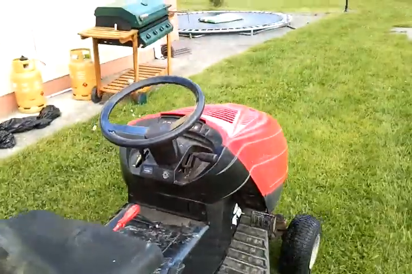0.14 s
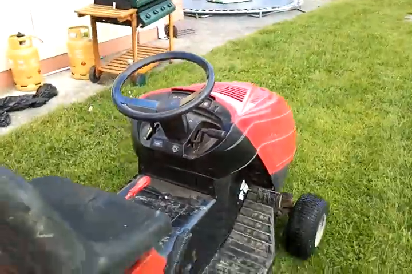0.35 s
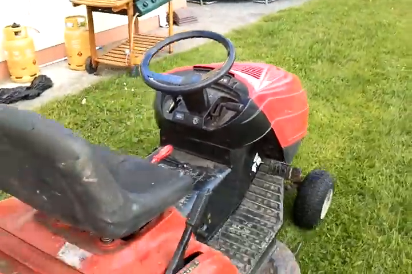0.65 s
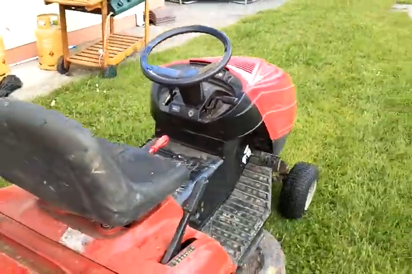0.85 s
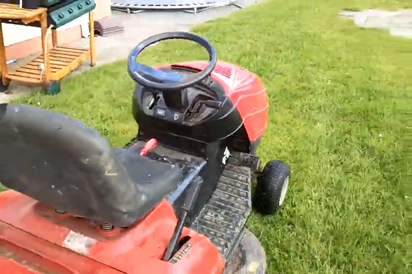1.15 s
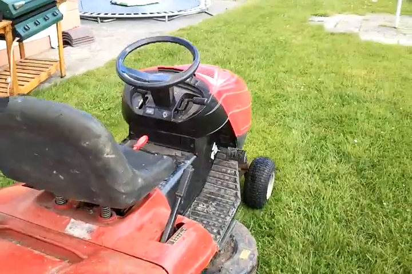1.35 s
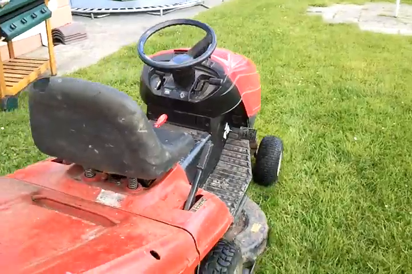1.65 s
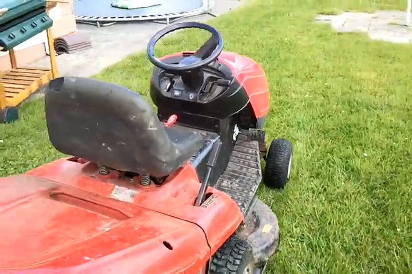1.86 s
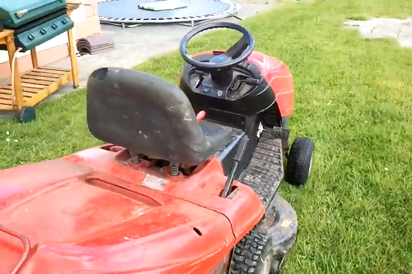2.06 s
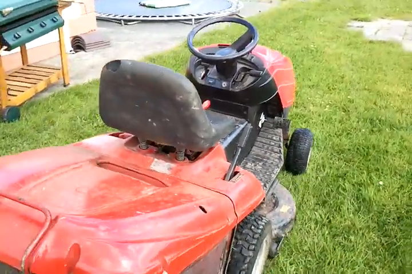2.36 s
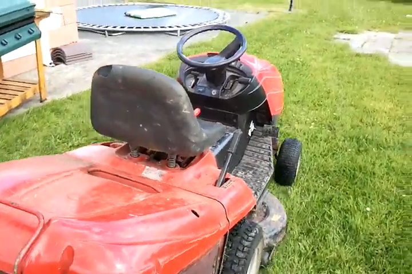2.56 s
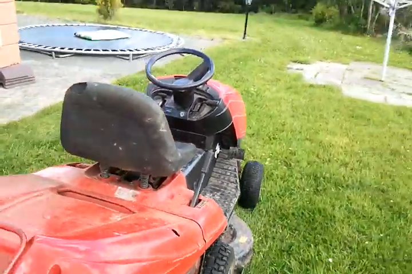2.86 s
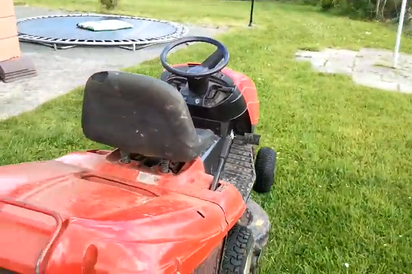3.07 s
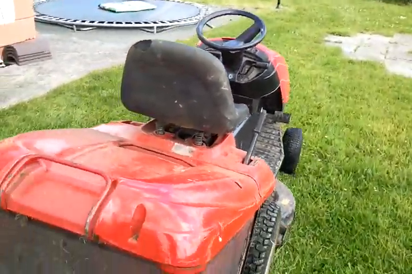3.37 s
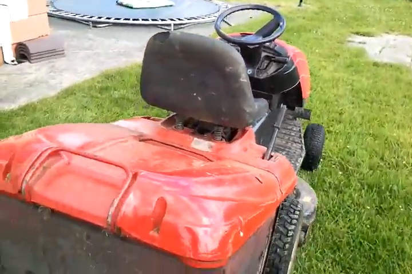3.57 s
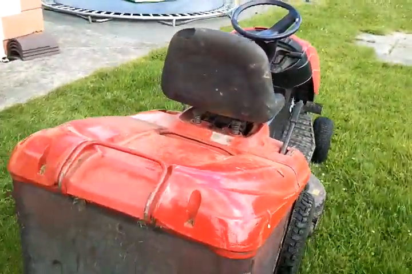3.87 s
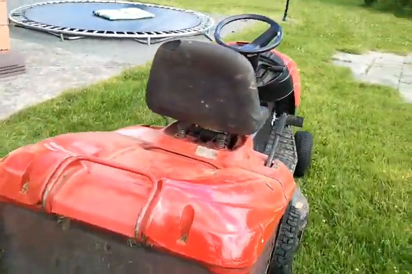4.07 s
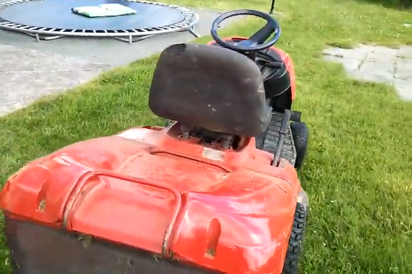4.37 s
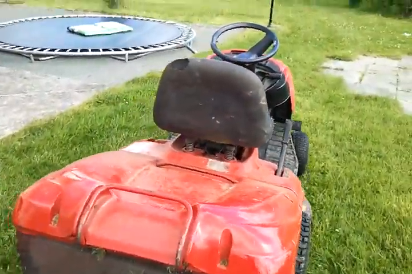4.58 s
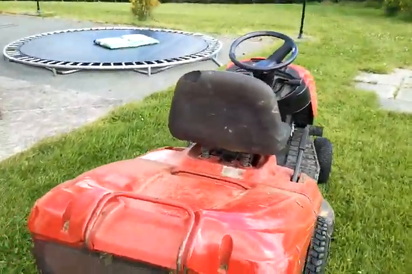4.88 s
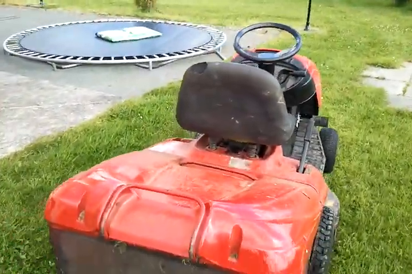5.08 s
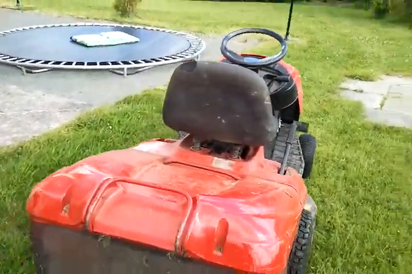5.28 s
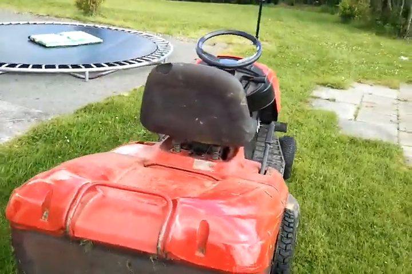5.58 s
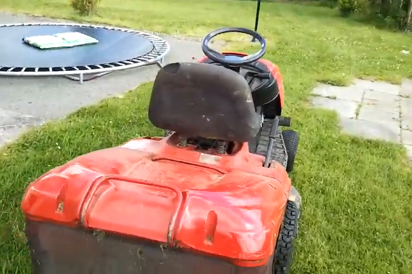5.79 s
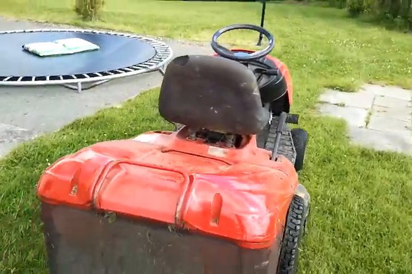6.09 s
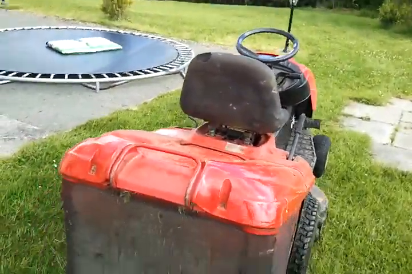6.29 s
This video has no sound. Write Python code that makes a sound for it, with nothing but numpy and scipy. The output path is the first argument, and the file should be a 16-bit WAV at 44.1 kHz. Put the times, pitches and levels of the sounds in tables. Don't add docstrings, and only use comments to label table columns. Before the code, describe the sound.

A tiny scrap of bright noise, then about half a second of silence. A ride-on mower engine fades in quickly and idles fast and steadily, with a throaty buzzing exhaust, fluttering fan whine and thin metallic clatter. Outdoors on a lawn, close to a small overloaded microphone that moves from beside the machine to behind it; wind thumps the microphone now and then.

```python
import sys
import numpy as np
from scipy import signal
from scipy.fft import rfft, irfft
from scipy.io import wavfile

SR = 44100
rng = np.random.default_rng(int(sys.argv[2]) if len(sys.argv) > 2 else 0)


def field_ratio(decibels):
    return 10 ** (np.asarray(decibels, dtype=float) / 20)


def wav_out(sig):
    wavfile.write(sys.argv[1], SR, np.round(np.clip(np.atleast_2d(sig).T, -1, 1) * 32767).astype(np.int16))


N = 284004
T = np.arange(N) / SR


def rms_one(x):
    return x / np.sqrt(np.mean(x ** 2) + 1e-20)


def in_time(rows):
    s, *columns = np.transpose(rows)
    return [np.interp(T, s, column) for column in columns]


def drift(rate):
    r = np.exp(-40 * np.pi * rate / SR)
    white = rng.standard_normal(N // 20 + 4002)
    slow = signal.lfilter([1], [1, -2 * r, r * r], white)[4000:]
    return np.interp(np.arange(N) / 20, np.arange(len(slow)), rms_one(slow - slow.mean()))


def resonance(x, hz, width_hz):
    r = np.exp(-np.pi * width_hz / SR)
    zeros = np.array([1, 0, -1]) * (1 - r * r) / 2
    poles = [1, -2 * r * np.cos(2 * np.pi * hz / SR), r * r]
    return signal.lfilter(zeros, poles, x)


def band(x, low_hz, high_hz):
    return signal.sosfilt(signal.butter(2, [low_hz, high_hz], "band", fs=SR, output="sos"), x)


def coloured(x, spectrum):
    hz, db = np.transpose(spectrum)
    bins = np.fft.rfftfreq(N, 1 / SR) + 1
    gain = field_ratio(np.interp(np.log(bins), np.log(hz), db, left=-60))
    return rms_one(irfft(rfft(x) * gain, N))


# time in seconds, level in dB.
SCRAP_LEVEL = [(0, -39), (.012, -46), (.02, -56), (.0255, -79), (.027, -140)]
# frequency in Hz, density in dB per Hz.
SCRAP_SPECTRUM = [(100, 5), (400, -4), (1000, -3), (5000, -5), (7500, -6), (9000, -27)]


def earlier_scene():
    noise = coloured(rng.standard_normal(N), SCRAP_SPECTRUM)
    return field_ratio(in_time(SCRAP_LEVEL)[0]) * noise * (T < .027)


# time in seconds, firings per second.
FIRING_RATE = [(0.6, 23.243), (1.087, 23.228), (1.573, 23.206), (2.06, 23.285), (2.547, 23.255),
               (3.033, 23.203), (3.52, 23.198), (4.007, 23.388), (4.493, 23.225), (4.98, 23.266),
               (5.467, 23.215), (5.953, 23.195), (6.44, 23.261)]


def engine_cycles():
    return np.cumsum(in_time(FIRING_RATE)[0]) / SR


# time in seconds, distance to the engine in metres.
DISTANCE = [
    (0.85, 1.29),
    (1.7, 1.67),
    (2.5, 1.97),
    (3.3, 2.08),
    (4.2, 2.44),
    (5.0, 2.65),
    (5.5, 2.34),
    (6.44, 3.04),
]


def spreading_loss():
    return 20 * np.log10(in_time(DISTANCE)[0])


STATION_TIMES = [
    2.5,
    3.75,
    4.8,
]
# multiple of the firing rate, level in dB.
EXHAUST_BESIDE = [(1, -20.0), (2, -10.0), (3, -11.0), (4, -5.0), (5, 0.0), (6, 1.0), (7, -7.0), (8, -12.0),
                  (9, -4.0), (10, -6.0), (11, -16.0), (12, -11.0), (13, -21.0), (14, -6.0), (15, -10.0),
                  (16, -22.0), (17, -14.0), (18, -33.0), (19, -26.0), (20, -16.0), (21, -12.0), (22, -15.0)]
EXHAUST_CORNER = [(1, -17.0), (2, -16.0), (3, -6.0), (4, 1.0), (5, -5.0), (6, 2.0), (7, -1.0), (8, -5.0),
                  (9, -5.0), (10, -32.0), (11, -7.0), (12, -21.0), (13, -24.0), (14, -13.0), (15, -18.0),
                  (16, -8.0), (17, -27.0), (18, -21.0), (19, -18.0), (20, -4.0), (21, -9.0), (22, -18.0)]
EXHAUST_BEHIND = [(1, -15.0), (2, -13.0), (3, -20.0), (4, -3.0), (5, 0.0), (6, -5.0), (7, -6.0), (8, -2.0),
                  (9, -7.0), (10, -12.0), (11, -11.0), (12, -24.0), (13, -10.0), (14, -16.0), (15, -8.0),
                  (16, -11.0), (17, -28.0), (18, -23.0), (19, -13.0), (20, 0.0), (21, -12.0), (22, -14.0)]
EXHAUST_ECHOES = [
    (.799, .29, -.9, .44, .2),
    (.788, .334, -.9, .66, -.05),
    (.794, .299, -.79, .762, -.575),
]


def exhaust(cycles, level_db, uneven_db, scatter, muffled_db):
    out = 0
    chance = rng.uniform(-1.27, 1, len(EXHAUST_BESIDE))
    cycles = cycles + 0.0015 * drift(9)
    wavering = [field_ratio(uneven_db * drift(4.9)) for k in range(5)]
    fires_at, pipe_after, pipe, wall_after, wall = np.transpose(EXHAUST_ECHOES)
    for k, *stations in zip(np.arange(1, 99), EXHAUST_BESIDE, EXHAUST_CORNER, EXHAUST_BEHIND):
        upper = k > 9
        turn = -2j * np.pi * k
        echoes = 1 + pipe * np.exp(turn * pipe_after) + wall * np.exp(turn * wall_after)
        smear = scatter * np.pi * chance[k - 1] * upper
        size = field_ratio(np.array(stations)[:, 1] + muffled_db * upper * (2.5 - k % 2))
        lead = np.unwrap(np.angle(echoes * np.exp(turn * fires_at))) + smear
        wave = np.cos(2 * np.pi * k * cycles + np.interp(T, STATION_TIMES, lead))
        swell = wavering[k % 5] ** (1 + 2.4 * upper)
        out = out - swell * np.interp(T, STATION_TIMES, size) * wave
    return field_ratio(level_db) * rms_one(out)


# time in seconds, opening toward the listener in dB.
FAN_OPENING = [
    (0.85, -17),
    (1.3, -2.5),
    (2.4, 3.5),
    (2.9, -10),
    (3.7, -14),
    (4.1, -3.5),
    (5.3, -1.5),
    (5.7, -15),
    (6.44, -9),
]


def fan(cycles):
    open_db, = in_time(FAN_OPENING)
    cycles = cycles + 0.0042 * drift(3.5)
    blade_db = -19 + open_db + 1.5 * drift(6.2)
    octave_db = -17.5 - 2.5 * T + 0.23 * open_db + 1.6 * drift(19)
    blade = field_ratio(blade_db) * np.sin(2 * np.pi * 24 * cycles)
    octave = field_ratio(octave_db) * np.sin(2 * np.pi * 48 * cycles)
    return blade + octave


# frequency in Hz, width in Hz, level in dB.
CASING_MODES = [(378, 14, -23), (470, 18, 9), (710, 70, -8), (856, 61, -7), (1020, 140, -14),
                (1355, 44, -4.5), (1809, 55, 2)]
# frequency in Hz, density in dB per Hz.
ROAR_SPECTRUM = [(60, -25), (130, -10), (250, -9.5), (420, -15.5), (600, -12.5), (700, -14), (1130, -18.5),
                 (1400, -19.5), (1900, -20.5), (2500, -26.5), (3400, -38)]


def casing(cycles, level_db, roar_db, knock_db):
    blows = np.zeros(N)
    for angle, blow_db in [(.71, 5.0), (.12, 0), (0.4, -7.0), (0.85, -8)]:
        turns = np.floor(cycles - angle + .003 * drift(20))
        at = np.flatnonzero(np.diff(turns) > 0)
        blows[at] += field_ratio(blow_db + 1.1 * rng.standard_normal(len(at)))
    rings = np.zeros(N)
    for k, (hz, width_hz, db) in enumerate(CASING_MODES):
        rings += field_ratio(db) * resonance(blows, hz, width_hz) * (-1) ** k
    roar = coloured(rng.standard_normal(N), ROAR_SPECTRUM) * field_ratio(0.92 * drift(30))
    return field_ratio(level_db) * (field_ratio(knock_db) * rms_one(rings) + field_ratio(roar_db) * roar)


# multiple of the firing rate, level in dB.
HUM_SIDE = [(23, -13.5), (25, -15), (27, -19.5), (28, -16), (29, -17), (31, -20), (32, -18), (33, -18),
            (35, -12.5), (36, -9), (37, -33), (38, -14.5), (40, -15), (41, -20), (42, -18), (43, -16),
            (44, -12.5), (46, -22), (50, -12), (51, -21), (55, -18), (58, -25)]
HUM_BEHIND = [(23, -12.5), (25, -21), (27, -14), (28, -40), (29, -19.5), (31, -19.5), (33, -13.5),
              (34, -23), (36, -14), (38, -25), (39, -17.5), (40, -19.5), (43, -18), (44, -16.5), (46, -16),
              (47, -18.5), (49, -17), (50, -17), (51, -20), (55, -17), (58, -15.5), (60, -12)]


def hum(cycles, multiples, uneven_db):
    out, angle = 0, np.linspace(0, 1, 2049)
    for part in range(6):
        shudder = np.zeros(len(angle))
        for k, db in multiples[part::6]:
            if k % 24:
                shudder += field_ratio(db) * np.sin(2 * np.pi * (k * angle + rng.random()))
        swell = field_ratio(uneven_db * drift(1.34))
        out = out + swell * np.interp((cycles + 0.00059 * drift(5.1)) % 1, angle, shudder)
    return rms_one(out)


def shudder_heard(cycles):
    rear = np.interp(T, STATION_TIMES[:2], [0, np.pi / 2])
    side_hum = hum(cycles, HUM_SIDE, uneven_db=3.5)
    rear_hum = hum(cycles, HUM_BEHIND, uneven_db=3.0)
    return np.cos(rear) * side_hum + np.sin(rear) * rear_hum


# frequency in Hz, density in dB per Hz.
CLATTER_SPECTRUM = [(900, -10), (2000, -13.5), (3000, 0), (4500, -2.5), (5800, -3.5), (7300, -0.5),
                    (9000, -2)]


def clatter(level_db, per_s, spread_db):
    excess = np.minimum(rng.exponential(1, N), 5)
    sizes = field_ratio(spread_db * excess) * rng.choice([-1, 1], N)
    ticks = sizes * (rng.random(N) < per_s / SR)
    clumps_db = 0.37 * drift(44) + 1.4 * drift(20)
    return field_ratio(level_db + clumps_db) * coloured(ticks, CLATTER_SPECTRUM)


# time in seconds, half length in seconds, rumble in dB.
GUSTS = [(0.653, 0.12, -12), (1.042, 0.072, -1.5), (1.214, 0.028, 1.5), (1.49, 0.065, -22),
         (1.942, 0.059, -14), (2.19, .04, -21), (2.368, 0.039, -13), (2.48, 0.027, -21), (2.72, 0.047, -13),
         (2.896, 0.058, -21), (3.13, 0.051, -22), (3.42, 0.084, -22), (3.79, 0.031, -20),
         (4.264, 0.046, -24), (4.377, .04, -16), (4.734, 0.06, -19), (5.3, 0.045, -25),
         (5.71, 0.059, -10.5), (5.936, 0.034, -11.5), (6.392, 0.034, -30)]
# time in seconds, half length in seconds, level in dB, top in Hz.
PORT_BUFFETS = [
    (0.835, 0.014, -6, 413),
    (1.25, 0.032, -12, 380),
    (5.929, .035, -5.5, 415),
    (6.014, 0.066, -3, 142),
]


def wind():
    push = field_ratio(-27.5 - 1 * T)
    for s, half_s, db in GUSTS:
        push = push + field_ratio(db) * np.exp(-((T - s) / half_s) ** 2)
    white = rng.standard_normal((3, N))
    low = rms_one(band(white[0], 30, 75))
    high = rms_one(band(white[1], 75, 400))
    out = push * field_ratio(1.5 * drift(13)) * (low + field_ratio(-8) * high)
    for s, half_s, db, top_hz in PORT_BUFFETS:
        puff = rms_one(band(white[2], 60, top_hz))
        out = out + field_ratio(db) * np.exp(-((T - s) / half_s) ** 2) * puff
    return out


# time in seconds, peak in dB, loudest ring in Hz.
PANEL_KNOCKS = [(0.8175, -8, 3140), (1.171, -16, 3090), (1.2517, -8, 7200), (1.7364, -15, 2790),
                (2.0228, -16, 5180), (2.3615, -9, 2870), (2.4363, -6, 3770), (2.579, -8, 2990),
                (2.7965, -10, 7280), (2.878, -10, 6920), (2.9548, -5, 3000), (3.011, -3.5, 3900),
                (3.1163, -9.5, 7650), (3.1672, -10, 3800), (3.2705, -13, 2820), (3.3088, -4.5, 3870),
                (3.3952, -12, 3010), (3.5366, -7, 7810), (3.684, -10, 3810), (3.7938, -13, 6350),
                (3.8307, -11, 3850), (4.1237, -6.5, 3870), (4.63, -7, 7280), (4.7137, -7.5, 7250),
                (5.5884, -5, 3970), (5.913, -7.5, 7380), (6.0195, -7, 6990), (6.1073, -4, 6820),
                (6.1815, -7, 3320), (6.3222, -6.5, 6290)]
# frequency in Hz, level in dB, decay by 60 dB in seconds.
PANEL_MODES = [(2250, -14, 0.0055), (2905, -5, 0.067), (3925, -4.5, 0.028), (5130, -21.5, 0.008),
               (6870, -3.5, 0.036), (7380, -4.5, .012)]


def panels(gain_db, crack_db, chatter_s):
    noise, out = rng.standard_normal(N), np.zeros(N)
    s, peak_db, pitch_hz = np.transpose(PANEL_KNOCKS)
    at = np.round(s * SR).astype(int)
    fall = np.exp(-1 / (chatter_s * SR))
    for hz, db, t60 in PANEL_MODES:
        hits = np.full(N, 1e-18)
        hits[at] = field_ratio(peak_db + db - 2.5 * np.abs(np.log2(hz / pitch_hz)))
        burst = noise * signal.lfilter([1], [1, -fall], hits)
        ring = resonance(burst, hz, np.log(1000) / np.pi / t60)
        crack = resonance(burst, hz, 1460)
        out += ring + field_ratio(crack_db) * crack
    return field_ratio(gain_db) * out


def scene():
    cycles, loss_db = engine_cycles(), spreading_loss()
    exhaust_db = -6 - 0.25 * loss_db
    casing_db = -7.5 - 0.89 * loss_db
    clatter_db = -15.5 - 0.9 * loss_db
    engine = exhaust(cycles, exhaust_db + 3.0, uneven_db=0.97, scatter=0.73, muffled_db=-4)
    engine = engine + fan(cycles)
    engine = engine + casing(cycles, casing_db, roar_db=-1.5, knock_db=-16.5)
    engine = engine + field_ratio(casing_db - 6.5) * shudder_heard(cycles)
    metal = clatter(clatter_db + 4.5, per_s=9000, spread_db=2.5)
    metal = metal + panels(gain_db=12, crack_db=-10.5, chatter_s=0.0045)
    return (engine + metal + wind())[None]


def microphone(dry):
    flat = np.clip(dry - .004, -.69, .69)
    return signal.sosfiltfilt(signal.butter(14, 8124, fs=SR, output="sos"), flat)


# time in seconds, gain as a factor.
TRACK_GAIN = [
    (0, 0),
    (.5985, 0),
    (.5995, .16),
    (.845, 1.03),
    (6.5, 1.03),
]


def faded(x):
    return np.clip(x * in_time(TRACK_GAIN)[0], -.707, .707)


def band_limit(x):
    return signal.sosfilt(signal.butter(12, 16370, fs=SR, output="sos"), x)


def record(dry):
    track = faded(microphone(dry)) + earlier_scene()
    track = signal.sosfiltfilt(signal.ellip(12, .02, 45, 15760, fs=SR, output="sos"), track)
    return band_limit(track)


dry = scene()
out = record(dry)
wav_out(out)
```